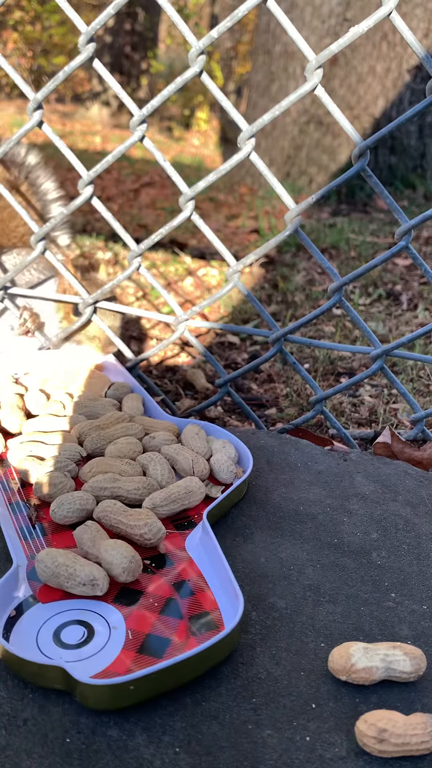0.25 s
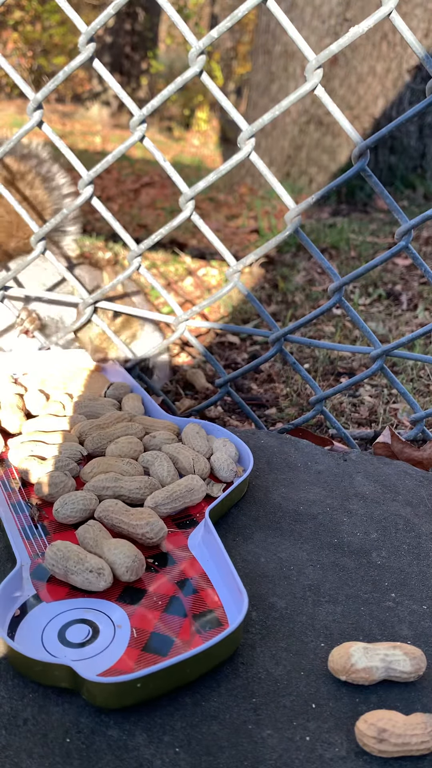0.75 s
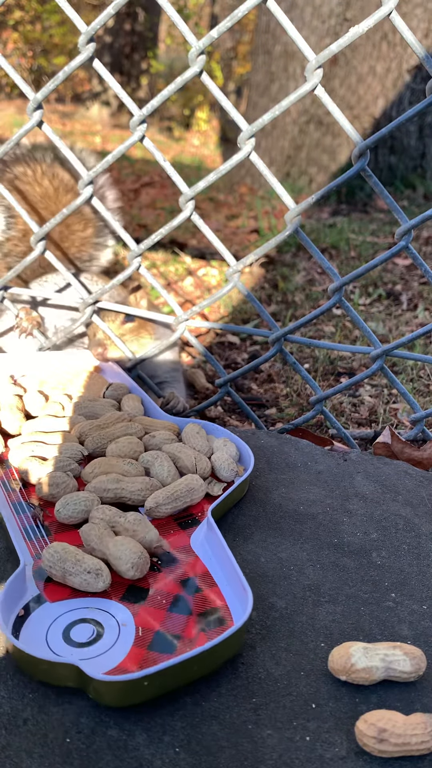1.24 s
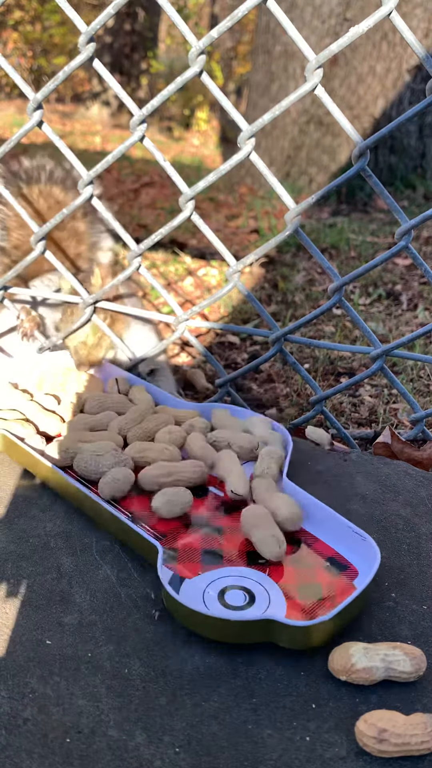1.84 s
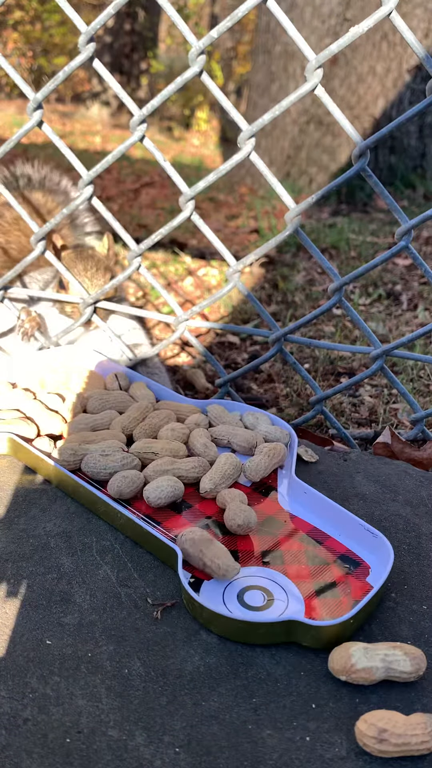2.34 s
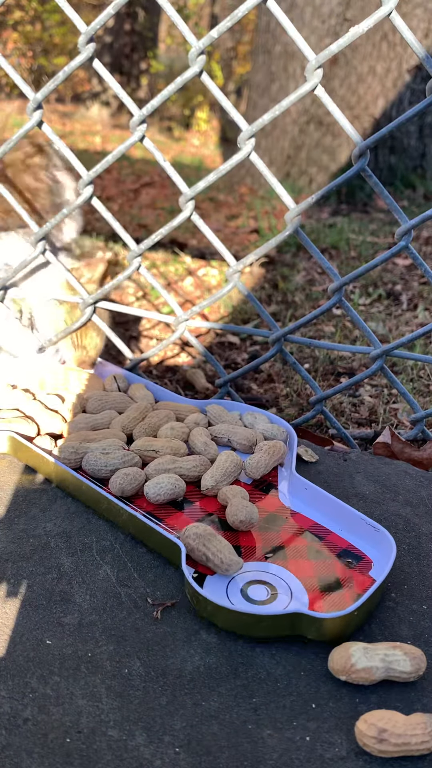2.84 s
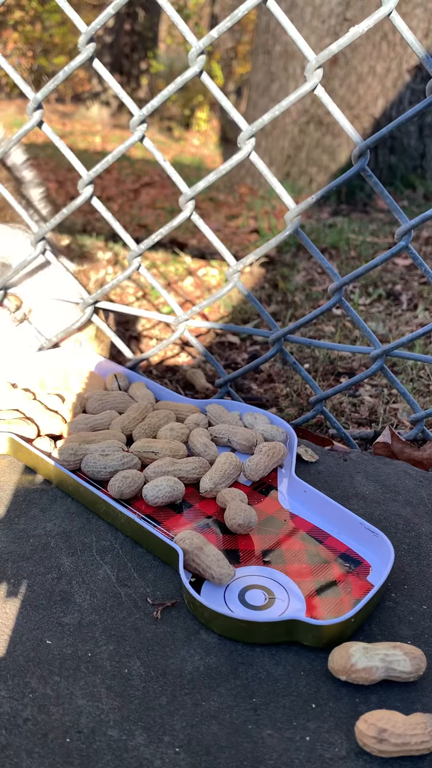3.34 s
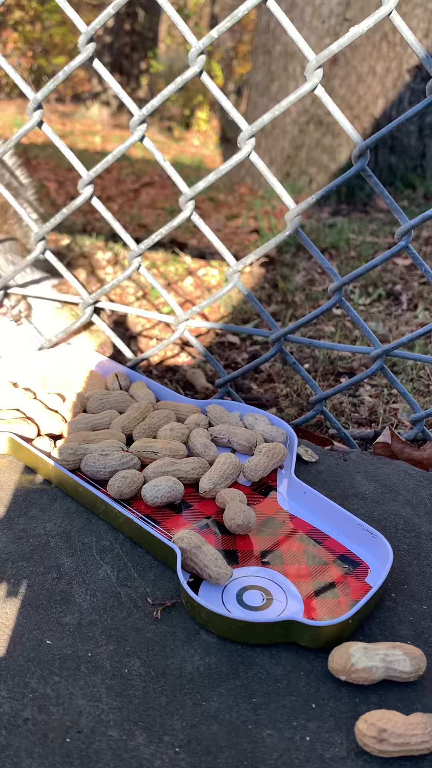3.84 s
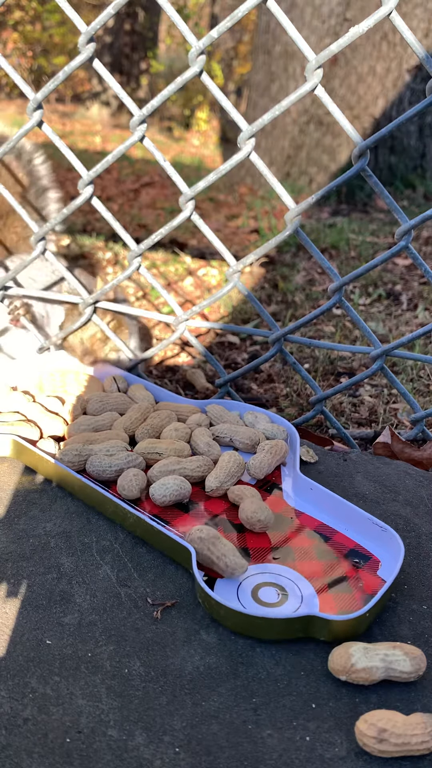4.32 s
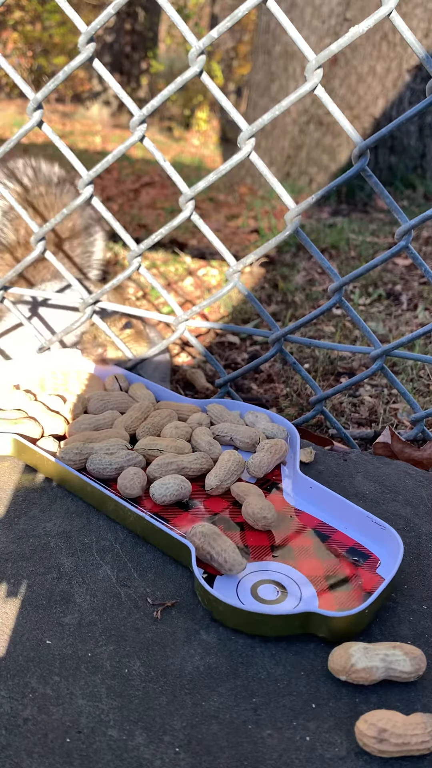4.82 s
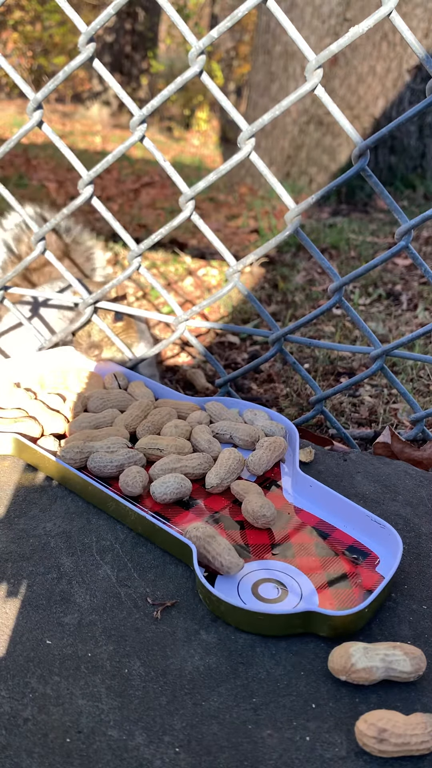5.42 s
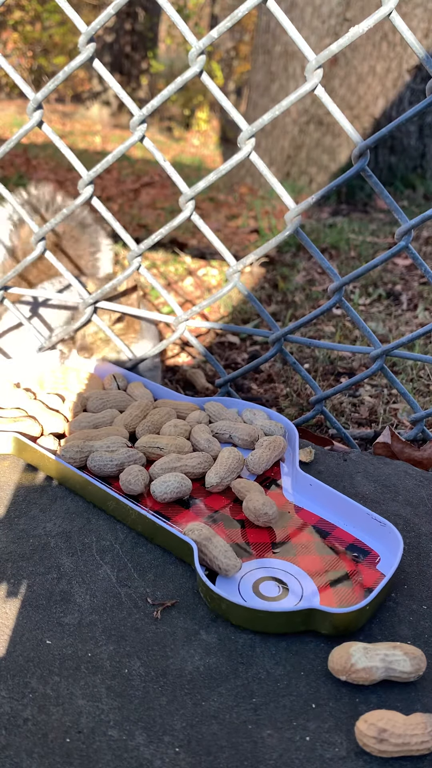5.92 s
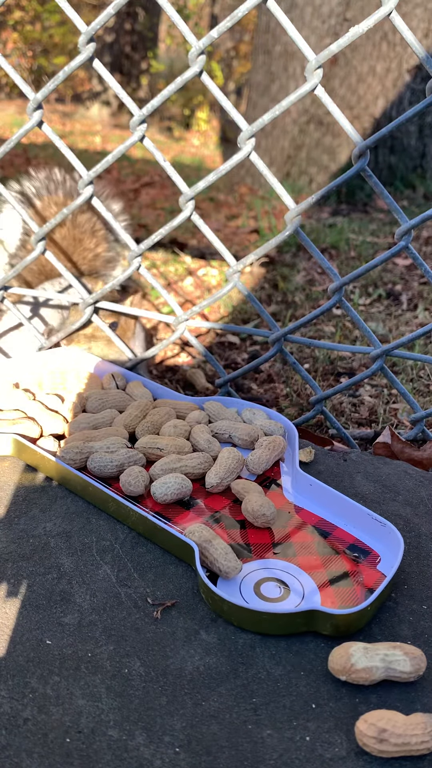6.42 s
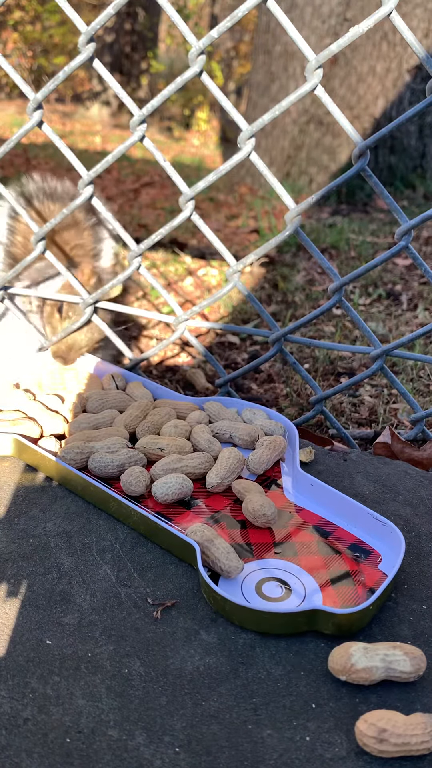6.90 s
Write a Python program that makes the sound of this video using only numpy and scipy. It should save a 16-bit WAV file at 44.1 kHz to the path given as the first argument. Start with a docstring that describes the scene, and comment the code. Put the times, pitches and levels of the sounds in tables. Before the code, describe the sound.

Outdoors, a low rumble of distant traffic runs throughout, with a faint wavering engine whine coming and going until about 5 seconds. Close to the microphone, a squirrel cracks and paws at peanuts, making small, dry, irregular clicks and crunches from the start. At about 1.1 seconds a sharper crack comes with a knock of the thin tray. From 1.4 to 2.2 seconds comes the busiest, loudest stretch: shells clatter and rub while the tray scrapes over a mat and knocks several times. Lighter, scattered cracks follow, with faint rustling of dry leaves. A crack and tray knock land at 4.6 seconds, then a loud, sharp snap at 5. Around 6 seconds the tray scrapes softly and bumps again amid a brief rustle. Small crunches continue, ending with a firmer crack just after 7 seconds.

```python
"""Peanut shells crack and clatter close to the microphone as a squirrel paws at them under a wire fence.
Each crack is a run of tiny fractures that rings the shell and its splinters. The thin tray knocks and
scrapes over a mat, and dry leaves rustle. Far off, traffic rumbles and an engine whines faintly.
The microphone is a phone with two ports a few centimetres apart."""
import sys
import numpy as np
from scipy import signal
from scipy.fft import rfft, irfft, next_fast_len
from scipy.io import wavfile
from scipy.ndimage import uniform_filter1d, map_coordinates

SR = 44100
rng = np.random.default_rng(int(sys.argv[2]) if len(sys.argv) > 2 else 0)


def wav_out(sig):
    """Save sig, one row per channel (or a flat mono array), as 16-bit PCM at SR to the path in sys.argv[1]."""
    wavfile.write(sys.argv[1], SR, np.round(np.clip(np.atleast_2d(sig).T, -1, 1) * 32767).astype(np.int16))


N = 315756


def amp(db):
    """dB to gain."""
    return 10 ** (np.asarray(db) / 20)


def unit(x):
    """x at rms 1."""
    return x / np.sqrt(np.mean(x ** 2) + 1e-20)


def along(points, hz):
    """Interpolate (Hz, value) points on a log axis."""
    f, v = np.transpose(points)
    return np.interp(np.log(hz + 1), np.log(f + 1), v)


def curves(rows, outside=None):
    """One value per sample for each column after the time."""
    s, *cols = np.transpose(rows)
    return [np.interp(np.arange(N) / SR, s, c, outside, outside) for c in cols]


def wobble(rate):
    """A smooth random curve, rate knots a second."""
    return map_coordinates(rng.standard_normal(int(N * rate / SR) + 4), [np.arange(N) * rate / SR])


def filtered(x, response):
    """x times a complex response of frequency."""
    m = next_fast_len(N + 8192)
    return irfft(rfft(x, m) * response(np.fft.rfftfreq(m, 1 / SR)), m)[..., :N]


def ringing(x, modes):
    """x through causal resonances that keep the power of white noise."""
    def response(f):
        h = sum((-1) ** k * amp(db) * 1j * f * width / (hz * hz - f * f + 1j * f * width)
                for k, (hz, width, db) in enumerate(modes))
        return h / np.sqrt(np.mean(abs(h) ** 2))
    return filtered(x, response)


def note(hz, t60):
    """One short damped vibration of energy 1."""
    t = np.arange(SR // 20) / SR
    ring = np.sin(2 * np.pi * hz * t) * amp(-60 * t / t60)
    return ring / np.linalg.norm(ring)


def gritty(count, per_s, spread_db, smooth):
    """Tiny fractures of uneven size, on a share of smooth noise."""
    hits = (rng.random(count) < per_s / SR) * amp(spread_db * rng.standard_normal(count))
    fractures = unit(hits * np.sign(rng.standard_normal(count)))
    return unit(fractures + smooth * rng.standard_normal(count))


def shuffles(per_s, t60):
    """An envelope of small random contacts that start quickly and fade."""
    starts = (rng.random(N) < per_s / SR) * amp(3 * rng.standard_normal(N))
    t = np.arange(SR // 8) / SR
    contact = amp(-60 * t / t60) * (1 - np.exp(-t / 0.0017))
    return unit(1.5 + unit(signal.fftconvolve(starts, contact)[:N]))


# Distant sound at the two ports. Each row: frequency in Hz, left-right correlation.
PORT_LIKENESS = [(60, 1), (130, 0.97), (290, 0.88), (640, 0.039), (1400, 0.096), (5000, 0.61)]
def far(spectrum):
    """Distant noise of rms 1, partly different at the two ports."""
    def colour(hz):
        turn = np.arccos(np.clip(along(PORT_LIKENESS, hz), -1, 1)) / 2
        return amp(along(spectrum, hz)) * [np.cos(turn), np.sin(turn)]
    mid, side = filtered(rng.standard_normal((2, N)), colour)
    return unit(np.array([mid + side, mid - side]))


# Three spectra of the roads, far off. Each row: frequency in Hz, relative density in dB.
ROAD_RUMBLE = [(13, -63.5), (22, -38.5), (39, -11.5), (75, 0), (93, -1), (125, -8), (146, -11), (177, -9.5),
               (209, -27), (260, -24), (340, -28), (570, -120)]
ROAD_DRONE = [(120, -36), (200, -3), (387, -12.5), (620, -16.5), (689, -20), (760, -21.5), (1200, -43),
              (1560, -72), (2640, -120)]
ROAD_HISS = [(600, 5), (1000, 10), (2000, -3.5), (4000, -56.5), (8000, -37.5), (14000, -31.5), (16500, -30)]
def traffic():
    """Far roads rumble and hiss all around; their drone slowly recedes."""
    fade_db_per_s = .5
    rumble = amp(-34.5 + 1.4 * wobble(4.22)) * far(ROAD_RUMBLE)
    drone = amp(-44.5 - fade_db_per_s * np.arange(N) / SR + wobble(3)) * far(ROAD_DRONE)
    hiss = amp(-57.5 + 0.33 * wobble(13)) * far(ROAD_HISS)
    return rumble + drone + hiss


# A distant engine's hum. Each row: frequency in Hz, relative density in dB.
ENGINE_HUM = [(240, -30), (290, -7.5), (330, 19), (370, 5.5), (400, -59)]
# Its runs. Each row: start and end in seconds, first and last pitch in Hz, level in dB, fade in dB/s.
ENGINE_RUNS = [(0, 1.454, 341.2, 370.9, -45.5, 1.5), (2.116, 2.963, 351, 338, -46, 15),
               (2.608, 3.495, 356, 380, -55, 0.5), (3.502, 4.499, 365, 335.5, -57.5, 3),
               (4.602, 5.35, 276.1, 246.7, -51, 3.5)]
def engine_whine():
    """A thin engine tone glides and wavers inside a rough hum, reaching one port before the other."""
    out = np.zeros((2, N))
    t = np.arange(N) / SR
    hum = amp(-1.5) * far(ENGINE_HUM)
    for start, end, first_hz, last_hz, db, fade_db_per_s in ENGINE_RUNS:
        hz, = curves([(start, first_hz), (end, last_hz)])
        gate = uniform_filter1d(curves([(start, 1), (end, 1)], outside=0)[0], size=6000)
        phase = 2 * np.pi * np.cumsum(hz + 2.11 * wobble(15)) / SR
        tone = np.sqrt(2) * amp(3.3 * wobble(7.5)) * np.sin(phase + [[.6], [-.6]])
        orders = amp(-13.5) * (np.sin(3 / 2 * phase) + np.sin(7 / 4 * phase))
        out += gate * amp(db - fade_db_per_s * (t - start)) * (tone + orders + hum)
    return out


# Resonances for the rustle and the cracks. Each row: centre in Hz, width in Hz, gain in dB.
SHELL_MODES = [(1200, 3300, 1), (2630, 1670, 6), (3657, 1100, -2.5)]
SPLINTER_MODES = [(4380, 1200, -2), (7640, 2770, 6.5), (9320, 7170, 1), (12410, 1300, 1),
                  (14300, 11000, -16)]
# Paws stirring, close by. Each row: time in seconds, level in dB, leaves over shells in dB.
PAW_STIRS = [(0, -65, -3.5), (.34, -66, -3.5), (.64, -60.5, -1), (.84, -65, -10.5), (1.43, -70, 9),
             (1.6, -38.5, -6.5), (2.03, -52, -3), (2.19, -84.5, -5), (2.49, -66.5, -4), (2.67, -60, 2),
             (2.87, -69, 1.5), (3.77, -66, -9.5), (3.97, -53, 0), (4.23, -74.5, 5.5), (4.46, -61.5, 1.5),
             (4.69, -67, -0.5), (5.52, -68, -3), (5.9, -66, -4.5), (6.2, -46.5, -11.5), (6.5, -67, -6),
             (7.16, -53, -6)]
def rustle():
    """Dense small grains in short shuffles: shells rub dully, leaves crisply."""
    rub_db, crisp_db = curves(PAW_STIRS)
    grains = gritty(N, per_s=1500, spread_db=5, smooth=0.65)
    rubbing = shuffles(per_s=60, t60=.05) * grains
    shells = amp(rub_db + 1.4 * wobble(50)) * ringing(rubbing, SHELL_MODES)
    leaf_level = amp(rub_db + crisp_db + 3.4 * wobble(17))
    leaves = leaf_level * ringing(shuffles(per_s=63, t60=0.088) * grains, SPLINTER_MODES)
    return shells + leaves


# The thin tray's resonances. Each row: centre in Hz, width in Hz, gain in dB.
TRAY_MODES = [(300, 74, -0.5), (449, 33, 6.5), (578, 48, -1.5), (1030, 260, -5.5), (1350, 1000, -6),
              (1940, 2100, -9)]
# Drags over the mat. Each row: start and length in seconds, level in dB, low and high rim note in Hz.
TRAY_DRAGS = [(1.45, 0.037, -47, 1500, 1900), (1.483, 0.059, -37, 1410, 1690),
              (1.563, 0.028, -36, 1340, 1640), (1.613, .025, -38, 1490, 2130),
              (2.632, 0.022, -56, 1960, 3200), (5.889, 0.02, -49, 2200, 3460),
              (5.941, 0.017, -45, 840, 1030), (5.979, 0.056, -46.5, 1120, 1740),
              (6.078, 0.078, -53, 1040, 1840), (6.114, 0.089, -48.5, 770, 1740)]
def tray_drags():
    """The tray's rim slips unevenly, grates and sings on two notes that depend on where it touches."""
    rise_s, fade_db_per_s = 0.024, 291
    out = np.zeros(N)
    t = np.arange(N) / SR
    slips = amp(2.5 * wobble(70)) * gritty(N, per_s=400, spread_db=4, smooth=0.45)
    grate = amp(-11.5) * ringing(slips, TRAY_MODES[3:])
    for start, length, db, low_hz, high_hz in TRAY_DRAGS:
        at = slice(round(start * SR), round((start + .4) * SR))
        age = t[at] - start
        level = np.clip(age / rise_s, 0, 1) * amp(db - fade_db_per_s * np.maximum(age - length, 0))
        rim = note(low_hz, t60=.016) + amp(-5) * note(high_hz, t60=.016)
        out[at] += level * (grate[at] + signal.fftconvolve(slips[at], rim)[:len(level)])
    return out


# The tray hits the mat, close by. Each row: start in seconds, level in dB, strongest note in Hz.
TRAY_KNOCKS = [(1.074, -21, 386), (1.647, -23, 790), (1.678, -22.5, 588), (1.856, -26, 924),
               (2.054, -28, 730), (2.123, -35.5, 864), (4.567, -26.5, 694), (5.036, -32, 615),
               (5.962, -34.5, 973)]
def tray_knocks():
    """A knock shakes all of the tray's resonances and favours the note nearest the blow."""
    shake, boom = np.zeros((2, N + SR))
    t = np.arange(SR // 4) / SR
    decay = amp(-60 * t / .05)
    for start, db, hz in TRAY_KNOCKS:
        at = slice(round(start * SR), round(start * SR) + len(t))
        shake[at] += amp(db - 4.5) * decay * rng.standard_normal(len(t))
        chatter = amp(db - 8) * decay * rng.standard_normal(len(t))
        chatter[0] = amp(db + 16)  # the blow itself
        boom[at] += signal.fftconvolve(chatter, note(hz, t60=0.03))[:len(t)]
    return ringing(shake[:N], TRAY_MODES) + boom[:N]


# Peanuts in the tray, close to the microphone. Each row: start in seconds, hollow note in Hz,
# knock level in dB, splinter level in dB, decay time in seconds (limited below).
SHELL_CRACKS = [(0.0211, 2000, -37, -46, 0.036), (0.069, 2360, -42.5, -53, 0.11),
                (0.175, 2010, -47, -58, 0.023), (0.24, 2860, -48, -56, 0.092),
                (0.391, 3700, -55, -56.5, 0.11), (0.4354, 1180, -58, -53, 0.18),
                (0.481, 1240, -37, -54, 0.11), (0.5099, 2320, -36, -47.5, 0.066),
                (0.528, 1960, -45, -46, 0.079), (0.6075, 3240, -38.5, -57, 0.078),
                (0.6445, 1130, -45, -51.5, 0.075), (0.703, 2070, -47, -54, 0.088),
                (0.7166, 1130, -37, -34.5, 0.027), (0.789, 2000, -50, -70, 0.056),
                (0.8355, 2170, -46.5, -54, 0.13), (0.8752, 3980, -42, -47.5, 0.1),
                (1.0284, 1140, -46, -48.5, 0.059), (1.058, 2130, -46.5, -50.5, 0.16),
                (1.074, 2000, -24.5, -28.5, 0.072), (1.14, 2000, -55, -48.5, 0.027),
                (1.25, 2260, -49, -51.5, 0.039), (1.373, 880, -39, -49.5, 0.025),
                (1.3987, 860, -40, -53.5, 0.26), (1.4243, 1490, -32, -33.5, 0.042),
                (1.439, 1900, -40.5, -45, 0.49), (1.4898, 1450, -36.5, -41.5, 0.24),
                (1.516, 1460, -27.5, -43.5, 0.061), (1.5767, 1360, -30, -51, 0.059),
                (1.5955, 1500, -31, -40, 0.33), (1.6458, 2440, -14, -15, 0.08),
                (1.6737, 2660, -21, -30, 0.15), (1.734, 2860, -33, -34.5, 0.034),
                (1.7767, 2610, -55, -35, 0.079), (1.852, 1420, -24, -29, 0.08),
                (1.8927, 1190, -34, -37, 0.051), (2.0487, 1520, -29, -21.5, 0.1),
                (2.054, 1470, -18.5, -28, 0.2), (2.1187, 1170, -30.5, -39, 0.16),
                (2.512, 1020, -45.5, -56.5, 0.16), (2.5514, 2700, -36, -45.5, 0.034),
                (2.5745, 1273, -40.5, -54, 0.04), (2.604, 3710, -40.5, -37, 0.087),
                (2.614, 3000, -48, -43, 0.047), (2.691, 2500, -60, -45, 0.027),
                (2.8765, 1420, -35, -45, 0.084), (2.9296, 1345, -45.5, -57, 0.069),
                (3.0179, 1370, -36, -48, 0.076), (3.297, 960, -43, -52, 0.066),
                (3.3394, 920, -46.5, -50, 0.046), (3.3532, 2820, -45, -44.5, 0.04),
                (3.376, 940, -41.5, -53, 0.055), (3.46, 1340, -37.5, -40.5, 0.036),
                (3.618, 3900, -51, -55.5, 0.069), (3.767, 2040, -53.5, -54, 0.062),
                (3.805, 970, -60, -53.5, 0.091), (3.8366, 2750, -44.5, -41, 0.094),
                (3.883, 1020, -44.5, -73, 0.049), (3.912, 1980, -53, -52, 0.05),
                (4.0216, 1540, -37, -50, 0.12), (4.1789, 1510, -41, -50, 0.032),
                (4.187, 2500, -53, -45, 0.055), (4.23, 2290, -40, -38, 0.039),
                (4.235, 2260, -47, -29.5, 0.033), (4.2709, 2100, -31, -47.5, 0.077),
                (4.322, 1500, -49, -50, 0.043), (4.335, 1180, -37.5, -48.5, 0.064),
                (4.356, 2110, -45, -52, 0.1), (4.406, 1040, -45, -58, 0.068),
                (4.4788, 2150, -44.5, -54.5, 0.065), (4.5004, 1950, -45.5, -48, 0.24),
                (4.55, 1050, -31, -36, 0.055), (4.5682, 2430, -22, -23, 0.031),
                (4.643, 2060, -46.5, -52, 0.034), (4.663, 1170, -47, -51, 0.08),
                (4.8556, 2300, -36, -45, 0.0088), (4.8916, 1040, -79, -46.5, 0.21),
                (4.9262, 2230, -41, -45.5, 0.018), (4.95, 1110, -39.5, -59.5, 0.021),
                (4.988, 2150, -45, -49.5, 0.53), (5.036, 2400, -16, -14, 0.015),
                (5.039, 2370, -21, -11.5, 0.031), (5.0871, 3540, -29, -33.5, 0.077),
                (5.1328, 1280, -43, -53.5, 0.047), (5.275, 1030, -36, -37.5, 0.035),
                (5.2957, 1190, -31.5, -34.5, 0.039), (5.33, 1480, -48.5, -52.5, 0.29),
                (5.403, 1230, -44, -51.5, 0.022), (5.7172, 2110, -46.5, -48.5, 0.083),
                (5.765, 1760, -49.5, -63, 0.075), (5.8001, 3480, -47, -46.5, 0.14),
                (5.841, 1080, -34.5, -45.5, 0.046), (5.9158, 2110, -49, -52.5, 0.084),
                (5.953, 1600, -67, -50, 0.03), (6.0428, 1130, -65, -48, 0.04),
                (6.113, 3050, -40.5, -56, 0.38), (6.1494, 1740, -33.5, -35.5, 0.081),
                (6.275, 1180, -31, -35, 0.052), (6.3403, 970, -38.5, -44.5, 0.044),
                (6.4188, 4200, -47, -50, 0.2), (6.4432, 880, -43.5, -45.5, 0.08),
                (6.455, 2750, -37.5, -46, 0.11), (6.5806, 1210, -48, -41.5, 0.05),
                (6.593, 1470, -41, -58, 0.039), (6.664, 1880, -48.5, -48, 0.045),
                (6.765, 1380, -42.5, -48.5, 0.091), (6.8671, 3350, -47, -34.5, 0.093),
                (6.9233, 1470, -35, -42, 0.047), (6.991, 1980, -45.5, -43.5, 0.039),
                (7.051, 1470, -33.5, -50, 0.051), (7.105, 2130, -42.5, -35.5, 0.034),
                (7.1267, 2010, -42.5, -50, 0.32), (7.15, 1330, -25, -31, 0.021)]
def shell_cracks():
    """Each crack is a run of fractures that holds briefly and thins out; shell and splinters answer."""
    knock, hollow, splinter = np.zeros((3, N + SR))
    t = np.arange(SR // 4) / SR
    for start, hz, knock_db, splinter_db, t60 in SHELL_CRACKS:
        at = slice(round(start * SR), round(start * SR) + len(t))
        t60 = np.clip(t60, .012, .3)
        snap = 1.3 * amp(-60 * t / (.15 * t60))  # the first break is the hardest
        burst = amp(-60 * np.maximum(t - 0.086 * t60, 0) / t60)  # longer runs also hold longer
        settling = amp(-24 - 60 * t / .15)  # neighbouring shells shift afterwards
        attack = 1 - np.exp(-t / (0.018 * t60))
        force = (snap + burst + settling) * attack * gritty(len(t), per_s=1400, spread_db=3, smooth=0.6)
        force[3] += 1.8  # the first contact is one dry tick
        knock[at] += amp(knock_db - 4) * force
        # every fragment favours two broad high bands of its own
        bands_hz = np.exp(rng.uniform(np.log(5800), np.log(8200), size=2))
        fragment = sum(note(band_hz, t60=.0025) for band_hz in bands_hz)
        fragment_ring = amp(-13.5) * signal.fftconvolve(force, fragment)[:len(t)]
        splinter[at] += amp(splinter_db) * (force + fragment_ring)
        # the first fractures sound the hollow note of the still closed shell
        opening = force * amp(-60 * t / 0.083)
        cavity = note(hz, t60=.01 * rng.uniform(1, 2.3))
        hollow[at] += amp(knock_db - 3.5) * signal.fftconvolve(opening, cavity)[:len(t)]
    low_cut_hz = 680  # thin shells radiate little below this
    thin = lambda f: (1j * f / (low_cut_hz + 1j * f)) ** 2
    shells = ringing(knock[:N], SHELL_MODES) + hollow[:N]
    splinters = filtered(ringing(splinter[:N], SPLINTER_MODES), thin)
    return filtered(shells + splinters, thin)


def scene():
    """Near sounds arrive as one wave with a little scatter from fence and ground; far sounds surround."""
    near = shell_cracks() + tray_knocks() + rustle() + tray_drags()
    t = np.arange(SR // 10) / SR
    tail = uniform_filter1d(rng.standard_normal((2, len(t))), size=3) * amp(-60 * t / 0.13)
    scatter = signal.fftconvolve(near[None], tail / np.linalg.norm(tail[0]), axes=1)[:, :N]
    return near + amp(-9.5) * scatter + traffic() + engine_whine()


# Treble roll-off: the highest hiss fades above 14 kHz. Each row: frequency in Hz, gain in dB.
TREBLE_ROLLOFF = [(14000, 0), (15500, -4), (15900, -9), (16300, -24)]
# Balance of the phone's ports. Each row: frequency in Hz, left minus right in dB.
PORT_BALANCE = [(60, -1.3), (380, -1.9), (800, -.3), (2400, -1.2), (8000, -0.6)]
# Phase between them. Each row: frequency in Hz, left port's lead in radians.
PORT_LEAD = [(0, 0), (150, .07), (1400, -.15), (2300, 1), (3500, .1), (4200, 2), (6500, 6.1), (7800, 6.6),
             (9300, 9.25), (10300, 9.6), (11800, 12.5), (13400, 13), (14200, 15.4), (16200, 15.8)]
def record(dry):
    """The two ports differ in phase and level; loud cracks saturate gently; the top is cut off."""
    ceiling, top_hz = .9, 16634
    side = np.array([[.5], [-.5]])
    def response(hz):
        gain = amp(along(TREBLE_ROLLOFF, hz) + side * along(PORT_BALANCE, hz))
        lead = np.interp(hz, *np.transpose(PORT_LEAD))
        return gain * np.exp(1j * side * lead)
    ports = filtered(dry, response)
    rounded = ports / (1 + abs(ports / ceiling) ** 4) ** .25
    return filtered(rounded, lambda hz: hz < top_hz)


dry = scene()
out = record(dry)
wav_out(out)
```